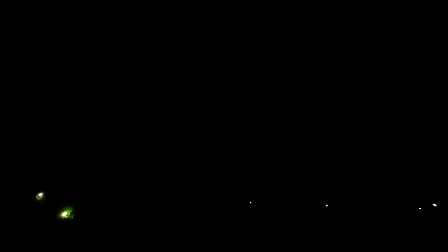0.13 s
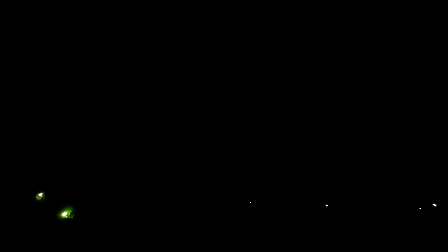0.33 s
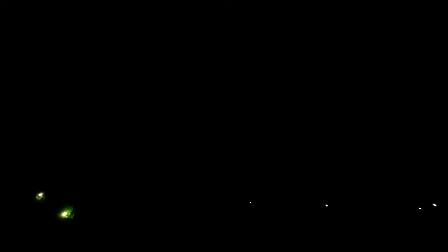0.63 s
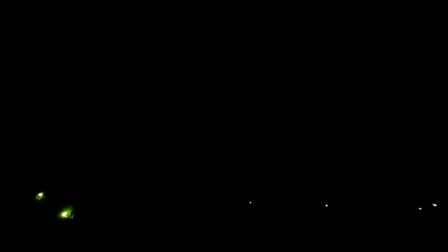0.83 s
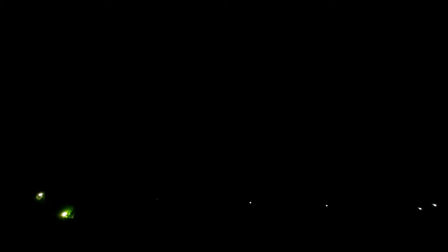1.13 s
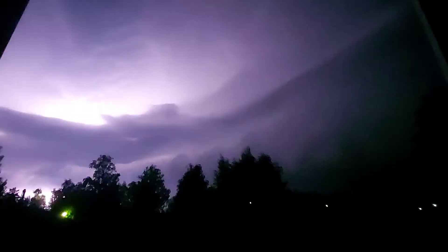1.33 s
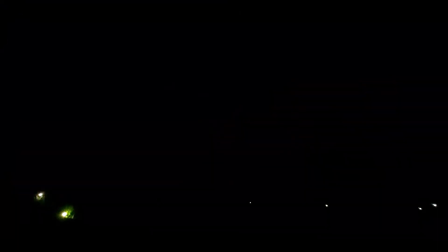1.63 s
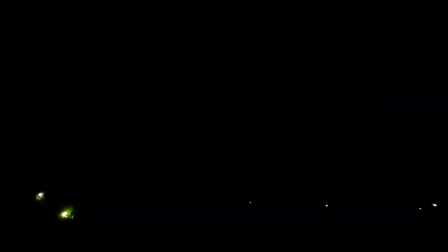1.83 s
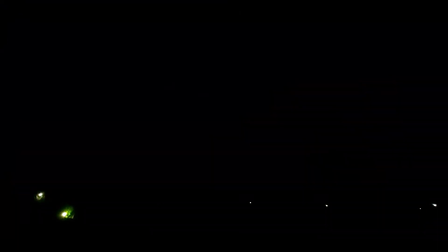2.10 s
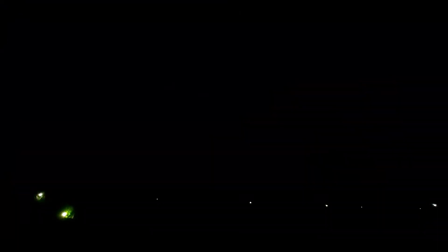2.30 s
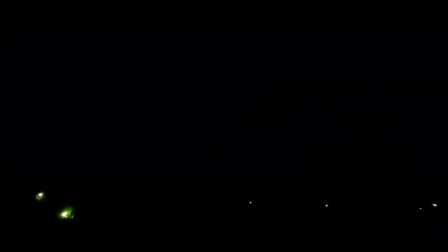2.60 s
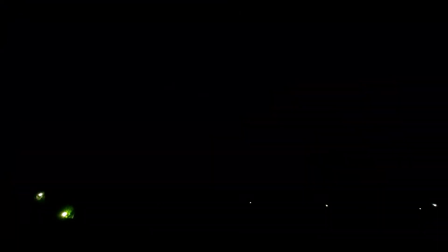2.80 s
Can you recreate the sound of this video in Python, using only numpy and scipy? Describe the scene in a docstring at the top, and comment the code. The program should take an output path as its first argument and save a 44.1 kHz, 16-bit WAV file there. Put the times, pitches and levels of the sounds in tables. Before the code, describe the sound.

Thunder rumbles and booms from the left on a stormy night, with faint rain.

```python
"""Thunder booms and rolls in from the left, over a sheltered spot on a stormy night.
Single shock fronts stand out of a dense roll of weaker ones; all of them come back once
from a far wall and ring in the shelter's resonances. Faint rain hisses behind,
with a thin trill, perhaps distant insects."""
import sys
import numpy as np
from scipy import signal
from scipy.fft import rfft, irfft, next_fast_len
from scipy.io import wavfile

SR = 44100
rng = np.random.default_rng(int(sys.argv[2]) if len(sys.argv) > 2 else 0)


def wav_out(sig):
    """Save sig, one row per channel (or a flat mono array), as 16-bit PCM at SR to the path in sys.argv[1]."""
    wavfile.write(sys.argv[1], SR, np.round(np.clip(np.atleast_2d(sig).T, -1, 1) * 32767).astype(np.int16))


N = 130095

# Strong shock fronts, some rows being louder returns of earlier fronts from the far wall: time_s, level_db,
# pitch_hz
CLAPS = [(0.55, -7, 308), (0.605, -9.5, 301), (.614, -7.5, 306), (0.635, -8, 270), (0.655, -12.5, 261),
         (0.669, -14.5, 310), (0.725, -2, 212), (0.736, -8.5, 145.3), (.761, -12.5, 212),
         (0.95, -14.5, 207), (1.005, -16, 186), (1.591, -12.5, 191), (1.611, -6, 173), (1.643, -12, 192),
         (1.816, -15, 185), (1.843, -16, 184), (1.949, -16.5, 189), (1.993, -13.5, 219), (2.019, -4, 173),
         (2.046, -4.5, 177), (2.076, -12, 152.5), (2.113, -11, 165), (2.169, -14.5, 157), (2.306, -16, 153),
         (2.393, -11, 149), (2.431, -18, 140), (2.452, -19.5, 139), (2.524, -15, 151), (2.678, -15.5, 151),
         (2.738, -18, 248), (2.875, -16.5, 152), (2.92, -20, 172)]
# Clap filter: freq_hz, gain_db
CLAP_EQ = [(30, -7.5), (70, -8.5), (130, 2), (250, 1), (370, 5.5), (450, -8.5), (700, 8), (1500, -19),
           (4000, -56)]
# Rough edge behind each clap: freq_hz, density_db
CRACK_SPECTRUM = [(250, -22.5), (520, 1), (720, -0.5), (1150, -17.5), (1700, -26.5), (3500, -57)]

# Middle bands of the roll: time_s, rumble_db, tear_db
RUMBLE_TEAR_LEVELS = [(0, -62, -48.5), (.05, -51, -58), (.07, -33, -45.5), (.21, -29, -38.5),
                      (.52, -26.5, -36), (.555, -21, -29.5), (.585, -24.5, -34), (.61, -21, -29.5),
                      (.69, -19.5, -33), (.78, -26, -38), (.92, -26.5, -43), (1.26, -30, -44.5),
                      (1.37, -36.5, -49.5), (1.49, -32, -44), (1.565, -37, -47.5), (1.585, -19, -38),
                      (1.72, -24, -38.5), (1.8, -32, -49), (1.99, -31.5, -44), (2.015, -22.5, -39),
                      (2.16, -24.5, -41), (2.2, -37.5, -45.5), (2.37, -29.5, -45), (2.5, -22, -45),
                      (2.6, -31, -48), (2.73, -27.5, -43.5), (2.83, -38.5, -51.5), (2.93, -26, -51.5)]
# Lowest bass and rough top of the roll: time_s, level_db
SUB_LEVEL = [(0, -67), (.08, -42), (.58, -37), (.62, -34), (.73, -27), (.85, -25), (.9, -49), (1.25, -52.5),
             (1.54, -57), (1.59, -34), (1.75, -38), (1.83, -63), (2.05, -42), (2.27, -52), (2.45, -36.5),
             (2.62, -53), (2.93, -42.5)]
RASP_LEVEL = [(0, -65.5), (.22, -53.5), (.58, -54), (.615, -45.5), (.72, -50.5), (.88, -60.5), (1.61, -60),
              (1.85, -63), (2.4, -61), (2.93, -70)]
# Roll bands, low to high: freq_hz, density_db
SUB_SPECTRUM = [(8, -42), (38, -8), (65, -8.5), (90, 6), (125, -13.5), (300, -51.5), (2000, -120)]
RUMBLE_SPECTRUM = [(30, -36), (70, -18.5), (95, 2), (140, 8.5), (210, 4.5), (300, -5.5), (400, -11.5),
                   (800, -60.5), (4000, -110)]
TEAR_SPECTRUM = [(40, -40), (120, -19), (220, -7), (300, 3), (375, 4), (440, -6.5), (520, -6.5), (680, -9),
                 (950, -17.5), (1300, -24.5), (6000, -95)]
RASP_SPECTRUM = [(500, -22.5), (1000, 9.5), (1250, -4.5), (1650, -3), (2100, -12.5), (2800, -25),
                 (6000, -55.5)]

# Scattered sound relative to direct: freq_hz, gain_db
SCATTER_EQ = [(30, -9.5), (110, -24), (300, -16), (520, -11), (1000, -6), (2000, 3)]
# Shelter resonances and dips: freq_hz, width_hz, gain_db
SHELTER_MODES = [(126.1, 12.1, 6), (156.7, 7.15, 7), (166.7, 5.86, -10), (196.1, 22.2, 7), (239, 28, -0.5),
                 (279.3, 10.2, 10.5), (323.8, 14.2, 8.5), (502.2, 27, 6), (617.8, 14, 6.5)]

# Background hiss level, ducked when the thunder hits: time_s, level_db
DUCKED_HISS_LEVEL = [(0.0, -56.5), (0.19, -53.5), (0.53, -53), (0.71, -60), (1.33, -59), (2.93, -59.5)]
# Rain colour: freq_hz, density_db
RAIN_SPECTRUM = [(800, 11), (2000, -6), (2800, -2.5), (4400, -0.5), (6500, -3), (8700, -4), (9500, -7.5),
                 (12000, -8), (15500, -20)]
# Trill strength: time_s, level_db
TRILL_LEVEL = [(0, -68), (.07, -61), (.3, -60), (.42, -66.5), (.9, -77), (2.07, -71), (2.93, -79)]
# Trill centre: time_s, pitch_hz
TRILL_PITCH = [(.3, 3125), (.42, 3050), (2, 3100)]

RIGHT_LAG_S = 0.00036


def claps(gain_db=-2, rise_cycles=0.54, fall_cycles=0.88):
    """Each strong front, rounded by distance, swings the pressure for a few dying cycles."""
    pressure, t = np.zeros(N), np.arange(N) / SR
    for time_s, level_db, pitch_hz in CLAPS:
        span = slice(*np.searchsorted(t, [time_s - 2 / pitch_hz, time_s + 10 / pitch_hz]))
        cycles = pitch_hz * (t[span] - time_s)
        envelope = swell(cycles, rise_cycles, fall_cycles)
        pressure[span] += from_db(level_db + gain_db) * envelope * np.sin(2 * np.pi * cycles)
    return from_left(colour(pressure, CLAP_EQ))


def cracks(gain_db=-30, rise_s=0.006, decay_s=0.027):
    """A burst of fine shocks swells with each strong front and dies away."""
    power, t = np.zeros(N), np.arange(N) / SR
    for time_s, level_db, _ in CLAPS:
        power += (from_db(level_db) * swell(t - time_s, rise_s, decay_s)) ** 2
    return shock_band(10 * np.log10(power + 1e-20) + gain_db, CRACK_SPECTRUM)


def roll(sub_gain_db=3, rumble_gain_db=-4.5, tear_gain_db=7, rasp_gain_db=4):
    """Countless fronts from along the lightning channel merge into four bands of noise."""
    sub = shock_band(curve(SUB_LEVEL) + sub_gain_db, SUB_SPECTRUM)
    rumble = shock_band(curve(RUMBLE_TEAR_LEVELS) + rumble_gain_db, RUMBLE_SPECTRUM)
    tear = shock_band(curve(RUMBLE_TEAR_LEVELS, column=2) + tear_gain_db, TEAR_SPECTRUM)
    rasp = shock_band(curve(RASP_LEVEL) + rasp_gain_db, RASP_SPECTRUM)
    return sub + rumble + tear + rasp


def shock_band(level_db, spectrum):
    """A direct shock stream from the left, plus an independent scattered one per side."""
    direct = unit_rms(colour(shocks(), spectrum))
    sides = unit_rms(colour(np.array([shocks(), shocks()]), spectrum))
    return from_db(level_db) * (from_left(direct) + colour(sides, SCATTER_EQ))


def shocks(rate_per_s=1500, spread_db=2.5):
    """Weak shock fronts: impulses of random time, size and sign."""
    count = rate_per_s * N // SR
    sizes = from_db(spread_db * np.minimum(rng.exponential(1, count), 4))
    signs = rng.choice([-1, 1], count)
    return np.bincount(rng.integers(0, N, count), sizes * signs, N)


def wall_echo(x, return_db, lag_s=0.0942):
    """The sound plus one return from a far wall."""
    return x + from_db(return_db) * np.array([delay(side, lag_s) for side in x])


def shelter(x):
    """The shelter rings after every front: one peak or dip filter per mode."""
    for freq_hz, width_hz, gain_db in SHELTER_MODES:
        gain = from_db(gain_db)
        tuning = -2 * np.cos(2 * np.pi * freq_hz / SR)
        damping = np.pi * width_hz / SR / min(gain, 1)
        numerator = [1 + damping * gain, tuning, 1 - damping * gain]
        x = signal.lfilter(numerator, [1 + damping, tuning, 1 - damping], x)
    return x


def rain(gain_db=6, pan_db=0.5):
    """Steady far rain: a smooth, wide hiss; a set gain curve ducks it under the thunder."""
    hiss = unit_rms(colour(rng.standard_normal((2, N)), RAIN_SPECTRUM))
    return hiss * from_db(curve(DUCKED_HISS_LEVEL) + gain_db) * from_db([[-pan_db], [pan_db]])


def trill(width_hz=35):
    """A thin, unsteady whistle of narrowband noise that sags a little in pitch."""
    lowpass = signal.butter(1, width_hz / 2, fs=SR, output="sos")
    flutter = signal.sosfilt(lowpass, rng.standard_normal((2, 2, N)))
    phase = 2 * np.pi * np.cumsum(curve(TRILL_PITCH)) / SR
    whistle = unit_rms(flutter[0] * np.cos(phase) + flutter[1] * np.sin(phase))
    return from_db(curve(TRILL_LEVEL)) * whistle


def swell(age, rise, fall):
    """Gaussian rise to 1 at age 0, then exponential decay."""
    return np.exp(-(np.minimum(age, 0) / rise) ** 2 - np.maximum(age, 0) / fall)


def colour(x, points, taps=8192):
    """Minimum-phase filter through (freq_hz, gain_db) points."""
    freq_hz, gain_db = np.transpose(points)
    grid_hz = np.maximum(np.arange(taps // 2 + 1) * SR / taps, 1)
    magnitude = from_db(np.interp(np.log(grid_hz), np.log(freq_hz), gain_db))
    cepstrum = irfft(np.log(magnitude))
    cepstrum[1:taps // 2] *= 2  # fold onto positive time: causal
    cepstrum[taps // 2 + 1:] = 0
    impulse_response = irfft(np.exp(rfft(cepstrum)))
    size = next_fast_len(N + taps, real=True)
    return irfft(rfft(x, size) * rfft(impulse_response, size), size)[..., :N]


def from_left(x):
    """Mono to stereo; the right ear hears it later."""
    return np.array([x, delay(x, RIGHT_LAG_S)])


def delay(x, lag_s):
    """Delay by whole samples."""
    lag = round(lag_s * SR)
    return np.concatenate([np.zeros(lag), x[:N - lag]])


def curve(rows, column=1):
    """One column of a time table, interpolated per sample."""
    columns = np.transpose(rows)
    return np.interp(np.arange(N) / SR, columns[0], columns[column])


def from_db(db):
    """Decibels to gain."""
    return 10 ** (np.asarray(db) / 20)


def unit_rms(x):
    """Scale to rms 1."""
    return x / np.sqrt(np.mean(x ** 2) + 1e-20)


def scene():
    """Thunder and its echo in the shelter; rain and trill behind."""
    booms = wall_echo(claps() + cracks(), return_db=-5)
    rolling = wall_echo(roll(), return_db=-13)
    return shelter(booms + rolling) + rain() + trill()


def record(dry):
    """Clip at full scale, then low-pass steeply."""
    stop_db, stop_hz = 70, 16300
    lowpass = signal.cheby2(16, stop_db, stop_hz, fs=SR, output="sos")
    return signal.sosfilt(lowpass, np.clip(dry, -1, 1))


dry = scene()
out = record(dry)
wav_out(out)
```